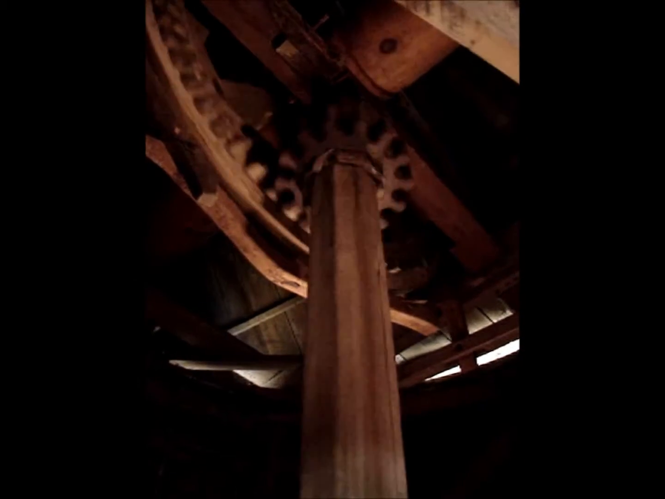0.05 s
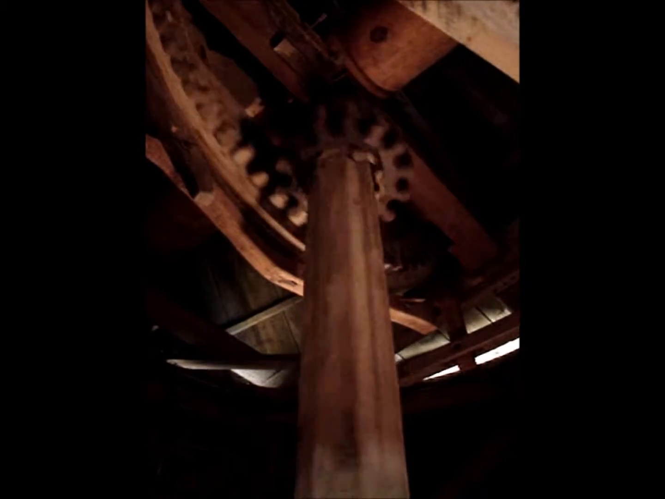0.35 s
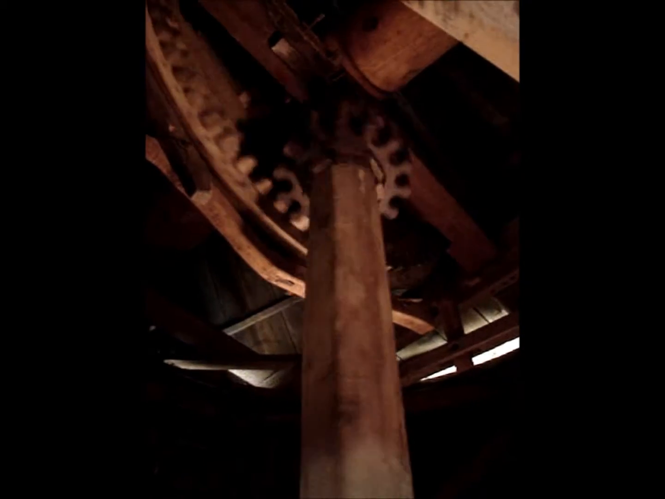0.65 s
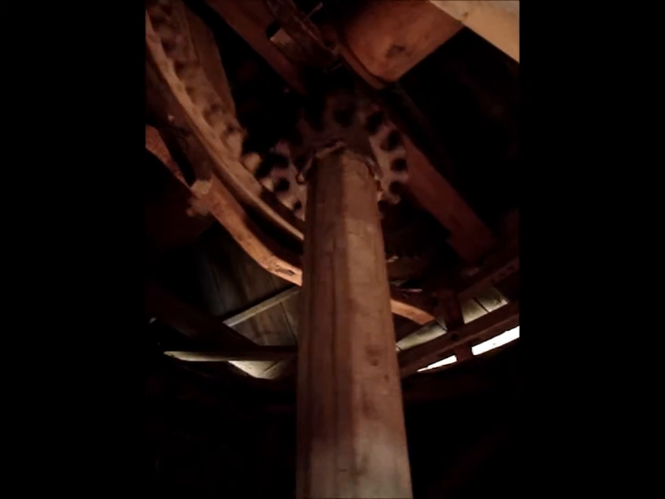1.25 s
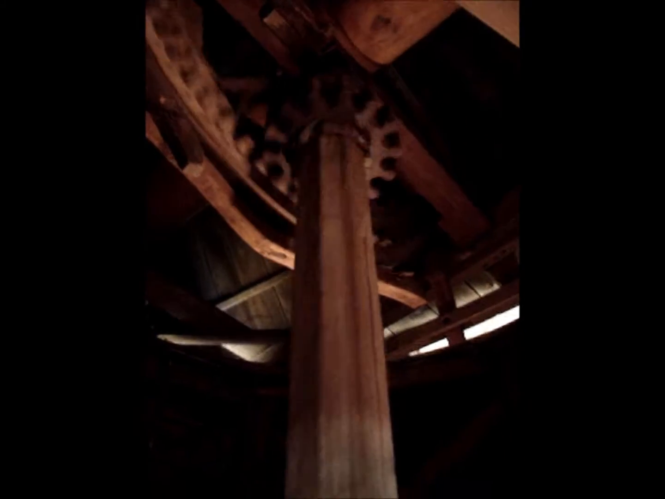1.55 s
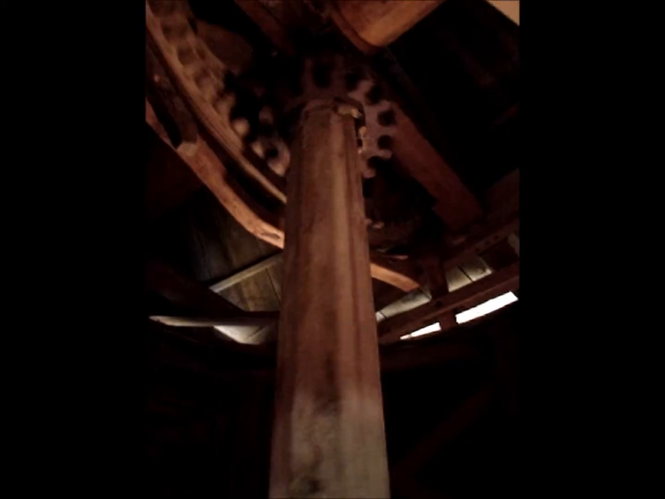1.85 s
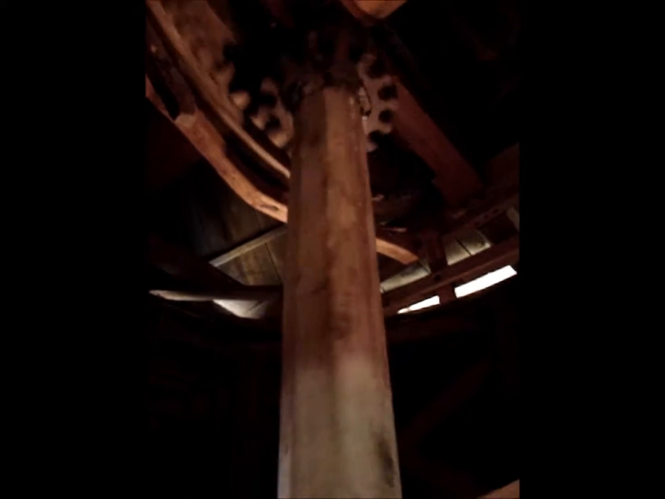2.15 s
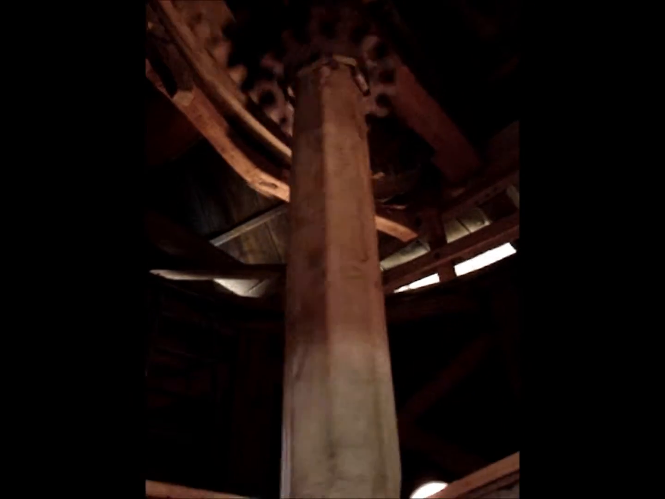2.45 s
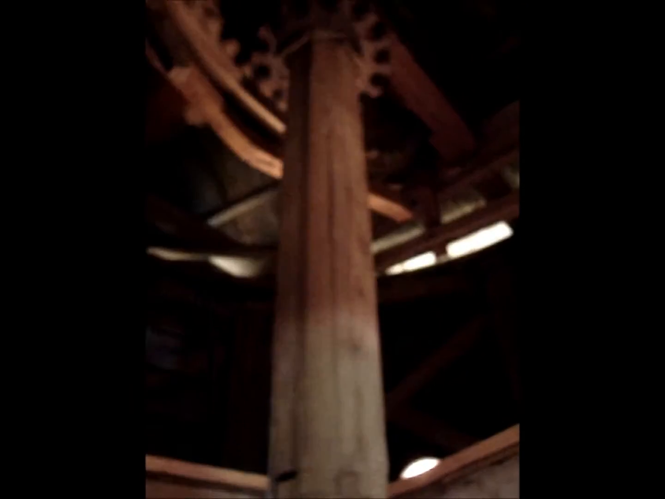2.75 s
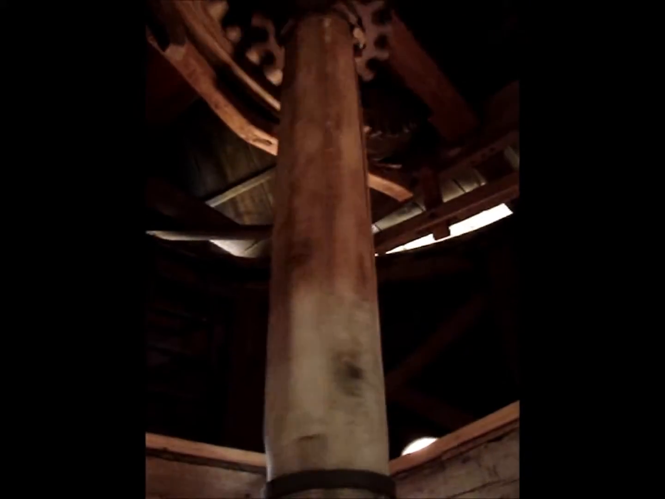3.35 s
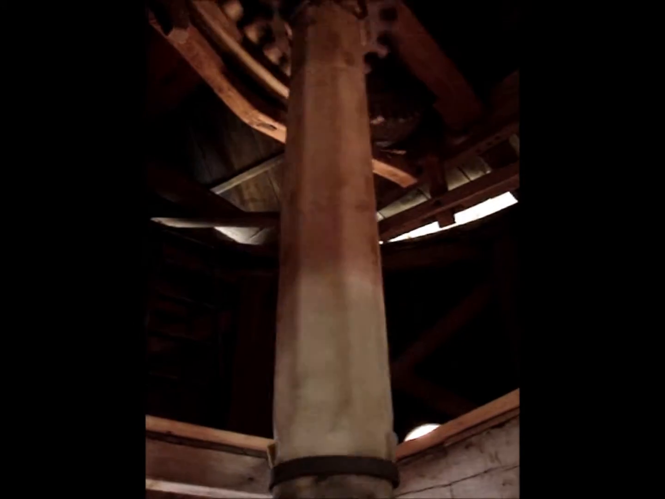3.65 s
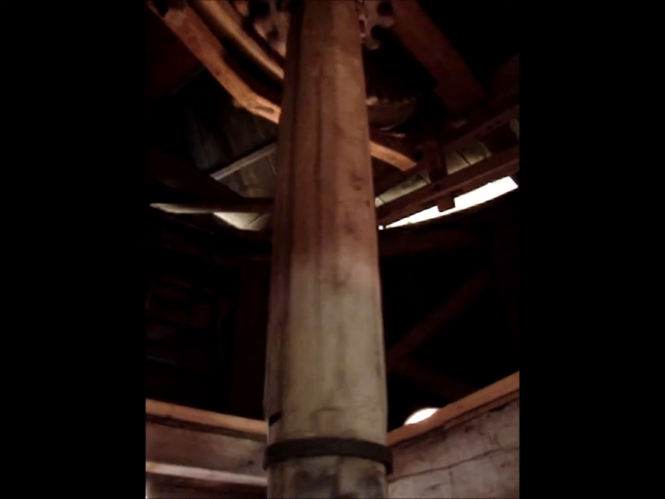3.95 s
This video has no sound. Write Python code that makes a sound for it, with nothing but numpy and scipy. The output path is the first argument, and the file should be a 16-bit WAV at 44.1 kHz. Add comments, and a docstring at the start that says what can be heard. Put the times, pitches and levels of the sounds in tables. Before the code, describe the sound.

Wooden cogs scrape past each other throughout, close up, in dry, gritty strokes about eight a second. Sharp ticks break in irregularly, strongest around 2 seconds, just after a softer, longer rub. Beams thud and creak behind them over the rumble of a turning shaft. The timber structure drones low from about 2.6 to 3.2 seconds, then the rumble eases. The small loft adds a short echo.

```python
"""Short, gritty scrapes, about eight a second: dry wooden cogs rub past each other in the cap of a
windmill, and now and then catch with a tick. Behind them beams thud and the frame drones under the
load, over the rumble of the turning shaft. Heard on one microphone close to the gearing, with the
short answer of the small timber loft around it."""
import sys
import numpy as np
from scipy import signal
from scipy.fft import rfft, irfft, next_fast_len
from scipy.io import wavfile
from scipy.ndimage import uniform_filter1d, map_coordinates

SR = 44100
rng = np.random.default_rng(int(sys.argv[2]) if len(sys.argv) > 2 else 0)


def bounce(signal):
    """Save signal as a 16-bit WAV file at the path given by the first command-line argument."""
    frames = np.transpose(np.atleast_2d(signal))
    limited = np.clip(frames, -1, 1)
    pcm = np.round(limited * 32767).astype(np.int16)
    wavfile.write(sys.argv[1], SR, pcm)


N = 4 * SR

# Spectrum of dry wood rubbing on wood: frequency_hz, gain_db
RASP_SPECTRUM = [(200, -30.5), (500, -13), (950, -0.5), (1250, -4.5), (1460, 1.6), (1750, 1), (2100, 0),
                 (2700, -3.5), (4200, -13), (6100, -22), (10000, -40.5)]
# Spectrum of the fine grit in that rubbing: frequency_hz, gain_db
GRIT_SPECTRUM = [(1000, -48), (3000, 2.5), (4800, 5), (6300, 1.5), (8000, -4), (10000, -13)]


def amp(db):
    """Decibels to gain."""
    return 10 ** (np.asarray(db) / 20)


def unit(x):
    """Scale to rms 1."""
    return x / np.sqrt(np.mean(x ** 2) + 1e-20)


def along(points, hz):
    """Read (frequency_hz, value) points on a log frequency axis."""
    knots_hz, values = np.transpose(points)
    return np.interp(np.log(hz + 1), np.log(knots_hz + 1), values)


def clock():
    """Time of every sample in seconds."""
    return np.arange(N) / SR


def wobble(knots_per_s):
    """A smooth random curve."""
    return map_coordinates(rng.standard_normal(1024), [clock() * knots_per_s], mode="wrap")


def swell(t, length):
    """A rounded rise and fall over the given length."""
    return np.sin(np.pi * np.clip(t / length, 0, 1))


def coloured(x, spectrum):
    """Minimum-phase filter through (frequency_hz, gain_db) points."""
    size = 2 * next_fast_len(N // 2 + SR // 10)
    gain = amp(along(spectrum, np.fft.rfftfreq(size, 1 / SR)))
    cepstrum = irfft(np.log(gain), size)
    cepstrum[1:size // 2] *= 2
    cepstrum[size // 2 + 1:] = 0
    return irfft(rfft(x, size) * np.exp(rfft(cepstrum)), size)[:N]


def friction(spectrum, slips_per_s=3000, smooth_share=0.22, patchy_db=1.5):
    """Dense stick-slip grains over smooth rubbing, rms 1; the colour shifts as the contact moves."""
    slips = (rng.random(N) < slips_per_s / SR) * rng.choice([-1, 1], N)
    strength_db = 2.4 * np.minimum(rng.exponential(size=N), 4)
    grains = np.sqrt(1 - smooth_share) * unit(slips * strength_db)
    smooth = np.sqrt(smooth_share) * rng.standard_normal(N)
    bands = signal.stft(grains + smooth, nperseg=1024)[2]
    patches = uniform_filter1d(rng.standard_normal(bands.shape), size=6, axis=0)  # across frequency
    patches = uniform_filter1d(patches, size=5, axis=1)  # across time
    rub = signal.istft(bands * amp(patchy_db * unit(patches)), nperseg=1024)[1][:N]
    return unit(coloured(rub, spectrum))


def shaft():
    """The turning shaft rumbles with the load; its bearing rushes, with a fluttering hiss."""
    # Load on the shaft, heard as the rise and fall of its rumble: time_s, level_db
    load = [(0, -19.5), (1.45, -21), (1.75, -20.5), (2.1, -21.5), (2.3, -27), (2.48, -26.5), (2.66, -20.5),
            (2.999, -24), (3.2, -20.5), (3.28, -24.5), (3.44, -23.5), (3.6, -26.5), (4, -28.5)]
    # Spectrum of the rumble: frequency_hz, gain_db
    rumble_spectrum = [(20, -12), (42, -4.5), (57, -25.5), (78, -0.5), (102, -10), (130, 1.5), (162, -6),
                       (228, 2), (290, -2.5), (480, 1.5), (640, 0), (900, -4), (1400, -10.5), (3000, -22),
                       (10000, -50)]
    load_db = np.interp(clock(), *np.transpose(load))
    sway = amp(0.8 * wobble(18))
    rumble = amp(load_db - 2.5) * sway * unit(coloured(rng.standard_normal(N), rumble_spectrum))
    rush = amp(-28.5 + 0.66 * (load_db - load_db.mean())) * friction(RASP_SPECTRUM)
    hiss = amp(-39.5 + 5.5 * wobble(45)) * friction(GRIT_SPECTRUM)
    return rumble + rush + hiss


def frame_drones(judder_db=2):
    """The heavy frame swells and judders at its low notes."""
    # Low notes of the frame: start_s, length_s, pitch_hz, level_db
    notes = [(0.687, 0.14, 77, -32.5), (2.635, 0.088, 126.5, -30.5), (2.72, 0.095, 131, -26.5),
             (2.925, 0.07, 129.7, -30.5), (3.02, 0.088, 130, -28), (3.16, .08, 121, -36)]
    t, out = clock(), np.zeros(N)
    for start_s, length_s, pitch_hz, level_db in notes:
        phase = 2 * np.pi * pitch_hz * (t - start_s) + 0.34 * wobble(30)
        out += amp(level_db) * np.sqrt(2) * swell(t - start_s, length_s) * np.sin(phase)
    return out * amp(judder_db * wobble(20))


def beam_thuds(broadness_s=0.017):
    """A shifting beam shudders around one pitch: a short knock is broad, a long creak focused."""
    # Beams thudding, knocking and creaking under load: start_s, length_s, pitch_hz, level_db
    thuds = [(.625, 0.069, 333, -20), (.805, 0.048, 255, -24.5), (.835, 0.052, 344, -21.5),
             (.915, 0.054, 188, -24.5), (1.245, 0.068, 159, -26.5), (1.39, 0.081, 230, -24),
             (1.484, 0.045, 1070, -16), (1.597, 0.025, 744, -17.5), (1.82, 0.09, 470, -25),
             (1.925, 0.061, 950, -21.5), (2.115, 0.07, 161, -30), (2.12, 0.035, 372, -22.5),
             (2.625, 0.072, 585, -19.5), (2.74, 0.032, 704, -18.5), (3.14, 0.093, 476, -24),
             (3.415, .07, 398, -22), (3.472, 0.085, 2640, -19.5), (3.95, 0.11, 605, -23.5)]
    t, out = np.arange(SR // 2) / SR, np.zeros(N + SR)
    hz = np.fft.rfftfreq(len(t), 1 / SR)
    for start_s, length_s, pitch_hz, level_db in thuds:
        width_hz = pitch_hz * broadness_s / length_s
        resonance = 1j * hz * width_hz / (pitch_hz ** 2 - hz ** 2 + 1j * hz * width_hz)
        flat_noise = np.exp(2j * np.pi * rng.random(len(hz)))
        envelope = swell(t, length_s)
        shudder = envelope * irfft(flat_noise * resonance ** 2, len(t))
        shudder *= np.linalg.norm(envelope) / np.linalg.norm(shudder)
        out[round(start_s * SR):][:len(t)] += amp(level_db) * shudder
    return out[:N]


def loft(gears, steps=24):
    """The timber loft's short answer, longest in the mids and changing as the contact travels."""
    # Time the loft takes to die away by 60 dB: frequency_hz, decay_s
    decay_times = [(150, 0.29), (1500, 0.83), (9000, 0.27)]
    out = np.zeros(N)
    for step in range(steps + 1):  # overlapping stretches, each with its own tail
        hz, t, bands = signal.stft(rng.standard_normal(SR // 2), SR, nperseg=256)
        decay = amp(-60 * t / along(decay_times, hz)[:, None])
        tail = signal.istft(bands * decay, SR, nperseg=256)[1]
        stretch = gears * swell(np.arange(N) * steps / N - step + 1, 2.23)
        start, end = max(0, (step - 1) * N // steps), (step + 1) * N // steps + 1
        answer = signal.fftconvolve(stretch[start:end], tail / np.linalg.norm(tail))[:N - start]
        out[start:start + len(answer)] += answer
    return np.pad(out, (SR // 200, 0))[:N]  # 5 ms behind the direct sound


def cog_ticks(t60_s=0.033):
    """A cog snags and frees itself with a dry crack: one sharp snap, then splintering."""
    # Cogs catching: start_s, level_db
    catches = [(.453, -7.5), (.552, -5.5), (0.884, -9), (1.054, -8.5), (1.288, -5), (1.986, -2),
               (2.066, -5), (2.246, -4), (2.43, -13), (2.775, -11.5), (2.886, -5), (3.305, -11), (3.61, -5),
               (3.789, -9)]
    # Spectrum of the crack: frequency_hz, gain_db
    crack_spectrum = [(150, -9), (600, 1), (2600, 2.5), (5500, -7), (10000, -25)]
    t, out = np.arange(SR // 20) / SR, np.zeros(N + SR)
    for start_s, level_db in catches:
        crack = amp(-60 * t / t60_s) * rng.standard_normal(len(t))
        crack[0] = 2.1  # the snap
        out[round(start_s * SR):][:len(t)] += amp(level_db) * crack
    return coloured(out[:N], crack_spectrum)


def cog_scrapes(release_s=0.042, grit_rise_s=0.011):
    """Each cog presses, rubs and lets go, driving a rasp, a hollow body and grit that builds up."""
    # Cogs rubbing past: start_s, attack_s, length_s, level_db, body_db, grit_db (both added to level_db)
    scrapes = [(0.046, 0.013, 0.069, -16.5, 1, -1.5), (0.217, 0.0073, 0.047, -16.5, 1, -3.5),
               (0.33, 0.039, 0.1, -28.5, 7, 6), (0.45, 0.0033, 0.036, -12.5, -3, -4.5),
               (0.546, 0.01, 0.06, -13, -8, -7), (0.682, 0.036, 0.081, -14.5, -10, -5),
               (0.859, 0.039, 0.073, -13, -9.5, -6), (1.052, 0.016, 0.044, -12, -6, -10),
               (1.092, 0.012, 0.081, -18, -17, -10.5), (1.212, 0.019, 0.12, -14.5, -2.5, -7),
               (1.354, 0.0047, 0.071, -17, -3, -8), (1.465, 0.0029, 0.11, -20.5, -0.5, -2),
               (1.56, 0.017, 0.061, -20, 2, -7.5), (1.663, 0.26, 0.21, -30.5, 9.5, 8.5),
               (1.899, 0.025, 0.046, -19.5, -10.5, 1), (1.989, 0.0015, 0.035, -16.5, -9.5, -4),
               (2.059, 0.013, 0.12, -15.5, -7, -4), (2.248, 0.0015, 0.013, -20, -16, -2),
               (2.417, 0.012, 0.036, -25.5, 4.5, 1.5), (2.516, 0.024, 0.07, -16.5, -1, -3),
               (2.622, 0.015, 0.015, -16.0, 2.5, -0.5), (2.738, 0.0034, 0.055, -17.0, 0.5, -3),
               (2.788, 0.0087, 0.031, -17, 0.5, 0.5), (2.87, 0.0058, 0.053, -16, 0, -1.5),
               (2.986, 0.0092, 0.071, -21.0, -1, -6), (3.12, 0.015, 0.062, -24, 4, -4.5),
               (3.301, 0.004, 0.028, -18.5, 4, 0), (3.355, 0.033, 0.085, -15.5, -1.5, -5),
               (3.462, 0.018, 0.11, -16, -4, -2), (3.616, 0.0064, 0.054, -19, -2, 0),
               (3.649, 0.029, 0.046, -14.5, -0.5, -3.5), (3.788, 0.013, 0.034, -16, -1, -4),
               (3.879, 0.0063, 0.046, -20, 1, -1.5), (3.94, 0.022, 0.048, -16.5, 5.5, -4)]
    # Spectrum of the cog's hollow body: frequency_hz, gain_db
    body_spectrum = [(100, -41.5), (250, -8.5), (470, -3), (680, -1.5), (1400, -6), (3000, -51)]
    # Spectrum of the rasp of a cog's hard edge: frequency_hz, gain_db
    edge_spectrum = [(900, -25), (2100, -2), (3200, 1.5), (4500, -7.5), (8000, -41.5)]
    # Level of the edge against the plain rasp: time_s, level_db
    edge_levels = [(0, -14), (.7, -6), (1.4, -6), (2.1, -2), (2.8, -4.5), (3.55, -2.5), (4, 0.5)]
    t, power = clock(), np.zeros((3, N))
    for start_s, attack_s, length_s, level_db, body_db, grit_db in scrapes:
        age_s = t - start_s
        release = np.exp(-np.clip(age_s - length_s, 0, 1) / release_s)
        pressure = np.clip(age_s / attack_s, 0, 1) * release
        layers = amp([[level_db - 2.5], [level_db + body_db - 5], [level_db + grit_db - 7.5]]) * pressure
        layers[2] *= np.clip(age_s / grit_rise_s, 0, 1)
        power += layers ** 2
    rasp_gain, body_gain, grit_gain = np.sqrt(power)
    edge_gain = amp(np.interp(t, *np.transpose(edge_levels)))
    rasp = (friction(RASP_SPECTRUM) + edge_gain * friction(edge_spectrum)) / np.hypot(1, edge_gain)
    judder = amp(0.9 * wobble(90))
    body = friction(body_spectrum)
    grit = friction(GRIT_SPECTRUM) * amp(1.94 * wobble(60))
    return judder * (rasp_gain * rasp + body_gain * body + grit_gain * grit)


def scene(loft_db=-10.5):
    """In mono: the gearing up close and the loft's answer, over the beams, frame and shaft."""
    gears = cog_scrapes() + cog_ticks()
    return (gears + amp(loft_db) * loft(gears) + beam_thuds() + frame_drones() + shaft())[None]


def record(dry, top_hz=10200):
    """The recorder rounds off the highest peaks and keeps nothing above its band limit."""
    rounded = dry / (1 + np.abs(dry) ** 6) ** (1 / 6)
    size = next_fast_len(N + SR // 2)
    passband = np.fft.rfftfreq(size, 1 / SR) < top_hz
    return irfft(rfft(rounded, size) * passband, size)[..., :N]


dry = scene()
out = record(dry)
bounce(out)
```